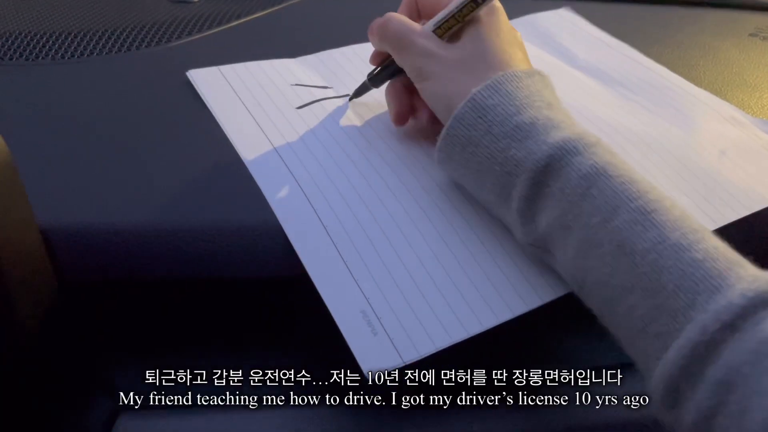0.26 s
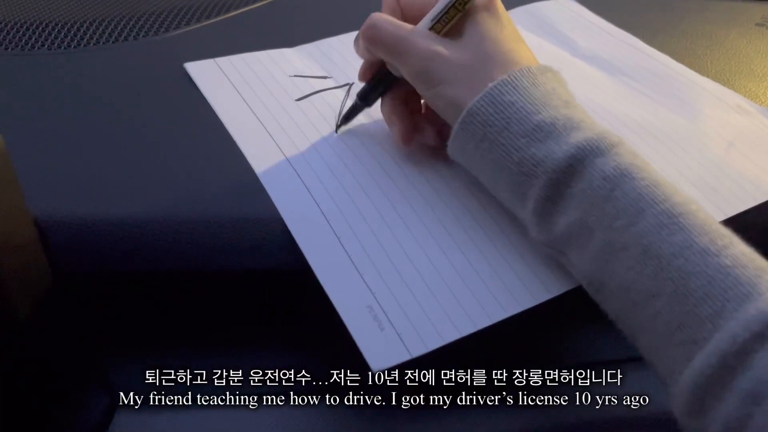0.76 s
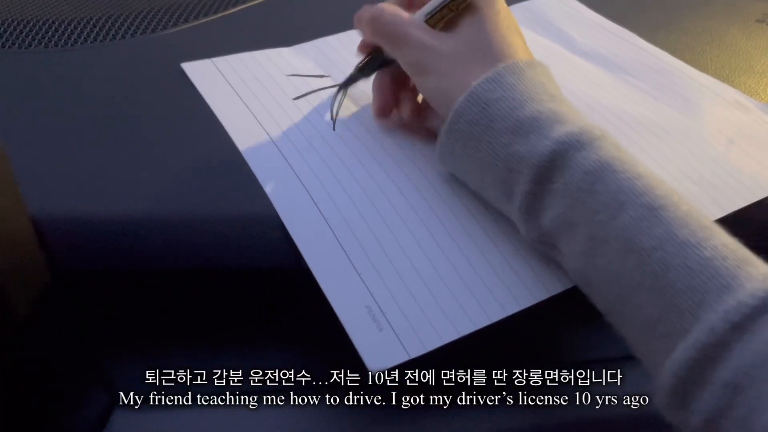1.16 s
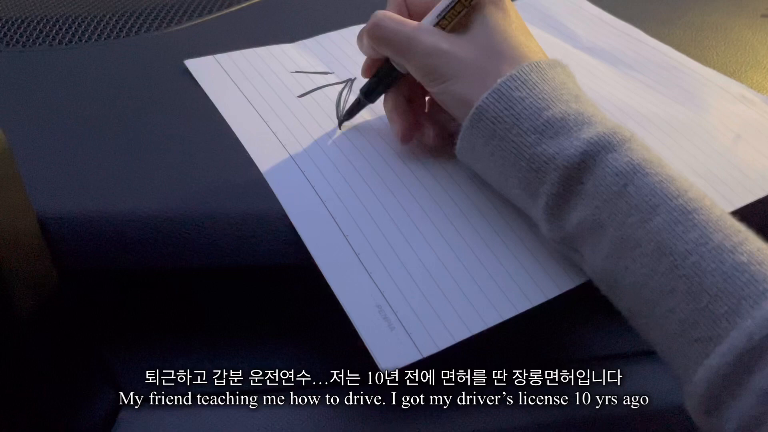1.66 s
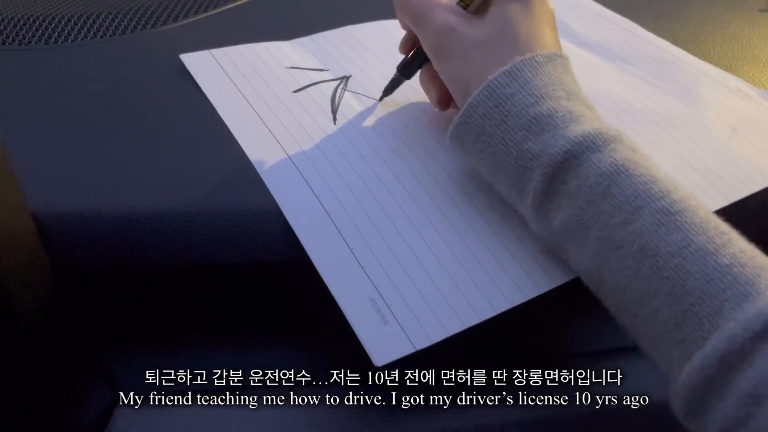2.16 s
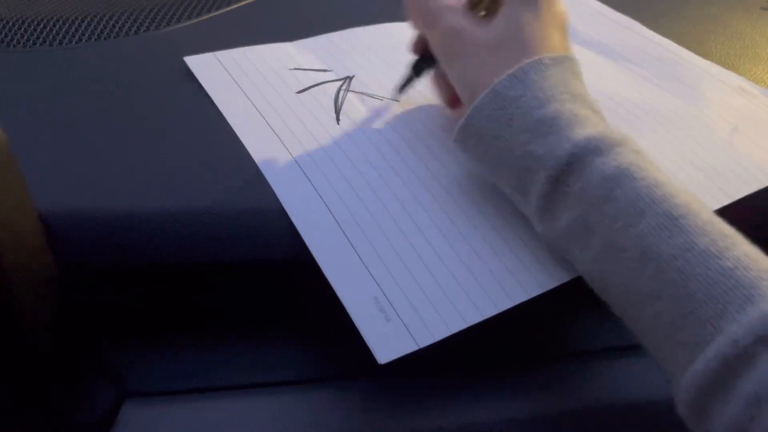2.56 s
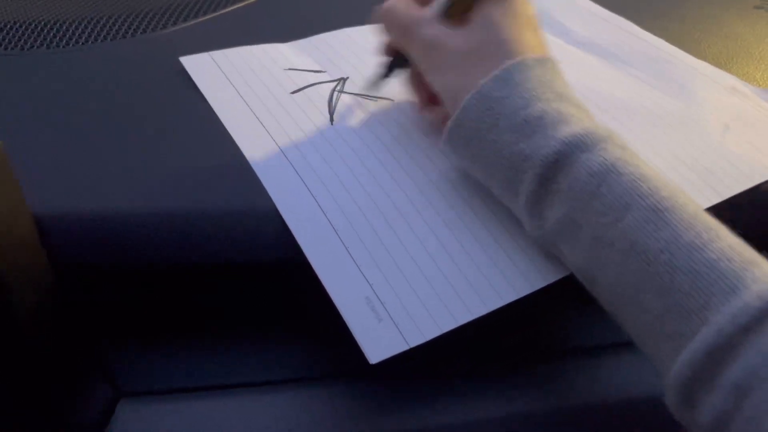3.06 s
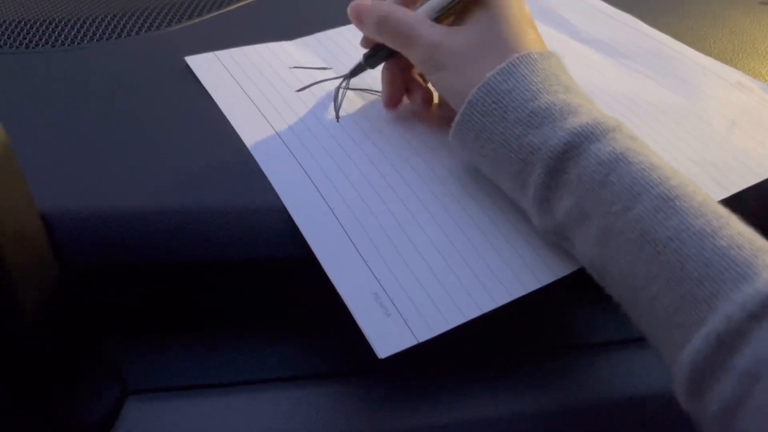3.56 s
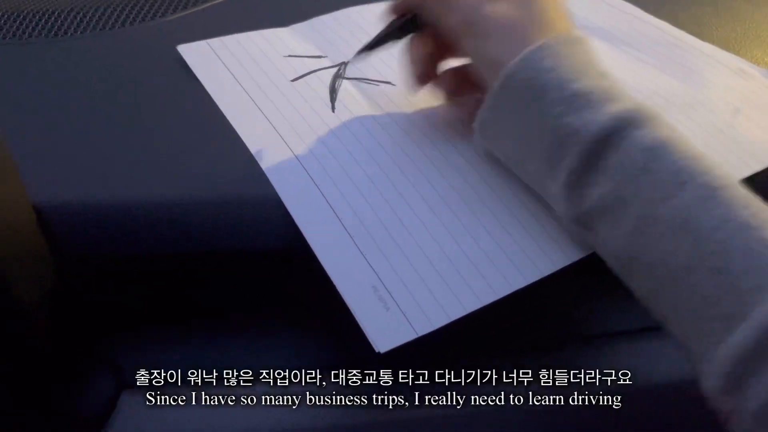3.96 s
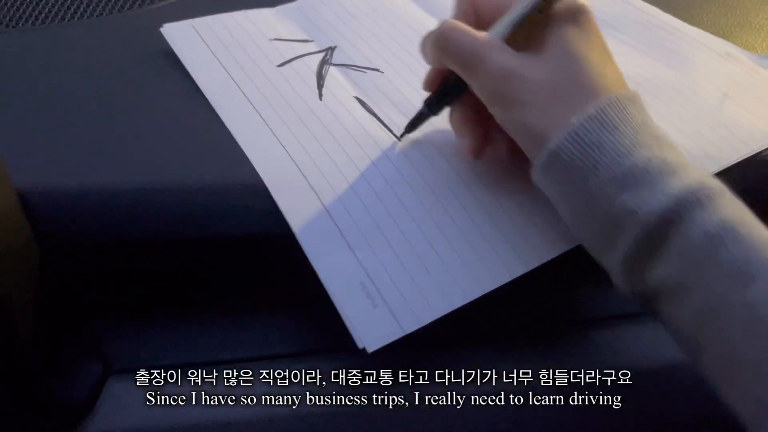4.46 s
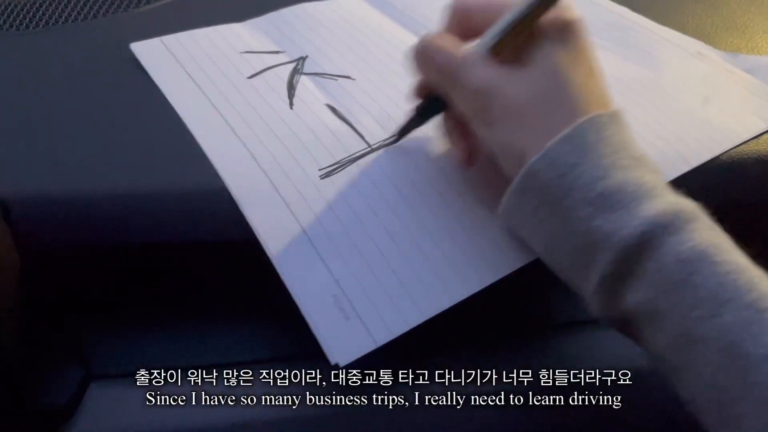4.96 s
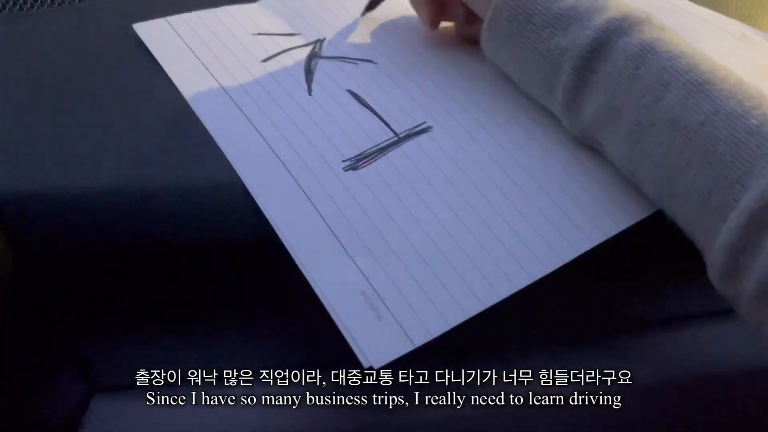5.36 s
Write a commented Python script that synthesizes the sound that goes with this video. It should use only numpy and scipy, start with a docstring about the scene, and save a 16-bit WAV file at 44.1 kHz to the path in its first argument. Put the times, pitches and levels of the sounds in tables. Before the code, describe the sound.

A felt-tip marker scratches short, dry strokes on paper over a hollow panel, with soft low thumps and tiny pauses, in a quiet car cabin.

```python
"""Felt-tip hatching on paper

A felt-tip marker hatches short strokes on a sheet over a hollow plastic panel in a quiet cabin.
Random fibre catches ring sheet and air gap and hiss off the felt; snags, ticks and bumps add noise bursts.
The drag shakes the panel's low modes, knocks strike them, and the resting hand rumbles in lurches."""
import sys
import numpy as np
from scipy import signal
from scipy.fft import rfft, irfft, next_fast_len
from scipy.io import wavfile

SR = 44100
rng = np.random.default_rng(int(sys.argv[2]) if len(sys.argv) > 2 else 0)


def decibels_to_gain(level_db):
    """Convert a level in decibels to a linear amplitude gain (20 dB per decade)."""
    exponent = np.asarray(level_db, float) / 20
    return 10 ** exponent


def output_pcm(signal):
    """Save a mono or channel-first signal as 16-bit PCM at the path in sys.argv[1].

    Samples are clipped to [-1, 1] before scaling.
    """
    pcm = np.clip(np.atleast_2d(signal).T, -1, 1) * 32767
    wavfile.write(sys.argv[1], SR, np.round(pcm).astype(np.int16))


N = 247167
SIDES = np.array([[1], [-1]])   # left, right


def rms_one(x):
    """Scales to rms 1."""
    return x / np.sqrt(np.mean(x ** 2) + 1e-20)


def drift(rate_hz):
    """Slow random wander of rms 1: noise twice through a one-pole low-pass."""
    r = np.exp(-2 * np.pi * rate_hz / SR)
    settle = 9000
    noise = rng.standard_normal(N + settle)
    return rms_one(signal.lfilter([1], [1, -2 * r, r * r], noise)[settle:])


def coloured(points):
    """Noise of rms 1 with a spectrum given as (Hz, dB per Hz), interpolated over log frequency."""
    hz, db = np.transpose(points)
    size = next_fast_len(N)
    grid = np.fft.rfftfreq(size, 1 / SR) + 1
    gain = decibels_to_gain(np.interp(np.log(grid), np.log(hz), db))
    return rms_one(irfft(rfft(rng.standard_normal(size)) * gain, size)[:N])


def in_time(rows):
    """Each column after the first, interpolated over the times in the first."""
    s, *columns = np.transpose(rows)
    return [np.interp(np.arange(N) / SR, s, c) for c in columns]


def resonate(x, hz, width_hz):
    """Two-pole resonance with gain 1 on top."""
    r = np.exp(-np.pi * width_hz / SR)
    b = np.array([1, 0, -1]) * (1 - r * r) / 2
    return signal.lfilter(b, [1, -2 * r * np.cos(2 * np.pi * hz / SR), r * r], x)


def body(x, modes, wander_db):
    """Parallel modes of alternating sign; their strengths wander as the contact point moves."""
    out = 0
    for k, (hz, width_hz, db) in enumerate(modes):
        gain = decibels_to_gain(db + wander_db * drift(10.9))
        out = out + (-1) ** k * gain * resonate(x, hz, width_hz)
    return out


def evened(x, share):
    """A driven body swells less by chance than free noise: part of its envelope is divided out."""
    envelope = np.abs(signal.hilbert(x, next_fast_len(N))[:N])
    return rms_one(x / (envelope + .15) ** share)


def dying_bursts(s, levels, t60_s):
    """One exponential decay per start time, for each row of levels."""
    starts = np.full((len(levels), N), 1e-18)
    starts[:, np.round(s * SR).astype(int)] = levels
    return signal.lfilter([1], [1, -decibels_to_gain(-60 / (t60_s * SR))], starts)


# Each row: start in seconds, length in seconds, time of the fastest moment as a share of the length
# (held to .02-.95), paper scrape height in dB, panel drag height in dB.
STROKE_ROWS = [(0.0, 0.63, 0.27, -69, -99), (0.176, 0.14, 0, -51, -56), (0.239, 0.19, 0.59, -47.5, -35.5),
               (0.46, 0.067, 0.18, -52, -45), (0.51, 0.12, 0.2, -67.5, -88),
               (0.579, 0.19, 0.59, -50, -28.5), (0.777, 0.22, 0.09, -54, -45),
               (0.919, 0.16, 0.45, -49.5, -29.5), (1.077, 0.13, 0.16, -50.5, -36),
               (1.193, 0.17, 0.51, -50, -30), (1.376, 0.1, 0.17, -51, -37),
               (1.459, 0.051, 0.15, -61.5, -60), (1.494, 0.17, 0.54, -49.5, -29),
               (1.691, 0.14, 0.49, -67.5, -58.5), (1.965, 0.07, 0.07, -73.5, -36.5),
               (2.01, 0.14, 0.37, -53, -38), (2.12, 0.11, 0, -77, -80), (2.194, 0.15, 0.23, -51.5, -45),
               (2.338, 0.16, 0.49, -55.5, -39.5), (2.461, 0.075, 0.13, -69.5, -80),
               (2.516, 0.16, 0.35, -50.5, -36.5), (2.674, 0.15, 0.49, -57, -39),
               (2.827, 0.15, 0.45, -52, -36.5), (2.975, 0.14, 0.58, -56.5, -37.5),
               (3.08, 0.077, 0.16, -72.5, -78), (3.139, 0.14, 0.35, -53.5, -39.5),
               (3.274, 0.11, 0.41, -59, -43.5), (3.34, 0.18, 0.52, -74, -87), (3.576, 0.028, 0, -78, -21.5),
               (3.62, 0.07, 0.43, -52, -34), (3.707, 0.04, 0.96, -64, -80), (3.731, 0.029, 0.28, -55, -29),
               (3.746, 0.12, 0.06, -57.5, -66), (3.792, 0.039, 0.25, -56.5, -33),
               (3.823, 0.067, 0.1, -58, -76), (3.851, 0.043, 0.37, -54.5, -34),
               (3.88, 0.049, 0.25, -58.5, -75), (3.915, 0.056, 0.23, -54.5, -33),
               (3.975, 0.068, 0.3, -66, -52.5), (4, 0.088, 0.95, -66, -40.5),
               (4.092, 0.059, 0.85, -50.5, -36.5), (4.141, 0.047, 0.51, -49.5, -54),
               (4.189, 0.045, 0.24, -52.5, -33), (4.202, 0.095, 0.31, -53, -72),
               (4.282, 0.054, 0.2, -51.5, -35), (4.323, 0.052, 0.2, -48.5, -41),
               (4.369, 0.054, 0.17, -50.5, -32.5), (4.403, 0.066, 0.23, -49.5, -41.5),
               (4.454, 0.041, 0.07, -51, -32.5), (4.462, 0.12, 0.28, -65.5, -88),
               (4.566, 0.032, 0.7, -66, -80), (4.577, 0.076, 0.3, -51.5, -45.5),
               (4.643, 0.072, 0.3, -46, -40), (4.695, 0.066, 0.77, -49.5, -34.5),
               (4.751, 0.069, 0.5, -47, -53), (4.818, 0.06, 0.36, -53, -54),
               (4.866, 0.062, 0.42, -48.5, -48), (4.916, 0.069, 0.36, -54, -45.5),
               (4.974, 0.054, 0.34, -47.5, -47), (5.019, 0.06, 0.37, -54, -46),
               (5.064, 0.062, 0.42, -48, -45.5), (5.104, 0.067, 0.6, -52.5, -46),
               (5.307, 0.12, 0.08, -72.5, -98), (5.359, 0.034, 0.25, -62.5, -91),
               (5.4, 0.039, 0.67, -72, -80), (5.423, 0.051, 0.35, -55, -38),
               (5.462, 0.048, 0.34, -51.5, -44), (5.497, 0.095, 0.58, -51.5, -51),
               (5.582, 0.083, 0.42, -51.5, -21)]
# Exponents of tip speed, in order: scrape, hiss, panel, thin top.
LAYER_SPEED_POWERS = (1.6, 2.43, 7.9, 3.7)
GRIP_S, LIFT_S = 0.00068, 0.013   # the felt bites fast and lets go slowly
GRIP_SHARE = 0.28   # share of the time to the fastest moment added to the grip
LIFT_SHARE = 0.06   # share of the length added to the lift
FIRM_STROKE_DB = -50
HISS_PER_SCRAPE, THIN_PER_SCRAPE = 1.26, 1.7   # dB per dB of scrape: light strokes are duller
AFTER_DB, AFTER_T60_S = (-13.5, -12.5, -16), 0.079   # rustle after the tip stops: scrape, hiss, thin top


def stroke_levels():
    """The tip speeds up from rest and slows to rest in each stroke; four layers follow that speed."""
    power, far, t = np.zeros((4, N)), np.zeros(N), np.arange(N) / SR
    exponents = np.array(LAYER_SPEED_POWERS)[:, None]
    for start_s, length_s, fastest, scrape_db, panel_db in STROKE_ROWS:
        now = (t > start_s) & (t < start_s + length_s)
        since_s, top = t[now] - start_s, np.clip(fastest, .02, .95)
        u = since_s / length_s
        speed = (u / top) ** top * ((1 - u) / (1 - top)) ** (1 - top)   # 1 at the fastest moment
        grip = np.minimum(since_s / (GRIP_S + GRIP_SHARE * top * length_s), 1)
        lift = np.minimum((length_s - since_s) / (LIFT_S + LIFT_SHARE * length_s), 1)
        contact = (grip * lift) ** 2
        hiss_db = FIRM_STROKE_DB + HISS_PER_SCRAPE * (scrape_db - FIRM_STROKE_DB)
        thin_db = FIRM_STROKE_DB + THIN_PER_SCRAPE * (scrape_db - FIRM_STROKE_DB)
        heights = decibels_to_gain(np.array([scrape_db, hiss_db, panel_db, thin_db]))[:, None]
        power[:, now] += (heights * contact * speed ** exponents) ** 2
        far[now] = u if fastest > .3 else 1 - u   # the direction of travel along the sheet
    fade = decibels_to_gain(-120 / (AFTER_T60_S * SR))   # per sample, of power
    paper = [0, 1, 3]
    rustle = signal.lfilter([1 - fade], [1, -fade], power[paper])
    power[paper] += decibels_to_gain(np.array(AFTER_DB))[:, None] ** 2 * rustle
    return *np.sqrt(power), far


def fibre_catches(per_s, spread_db):
    """Dense random slips of felt over paper fibres, a few much larger than the rest."""
    sizes = decibels_to_gain(spread_db * np.minimum(rng.exponential(1, N), 5)) * rng.choice([-1, 1], N)
    return sizes * (rng.random(N) < per_s / SR)


# Reflections off fingers and sleeve. Each row: mean delay in ms, level in dB.
ECHO_ROWS = [(1.301, -4), (2.895, -2.5), (5.301, -5.5)]


def echoed(x):
    """Close echoes whose paths change as the hand moves draw shifting stripes in the hiss."""
    at = np.arange(N)
    out = x
    for ms, db in ECHO_ROWS:
        delay = SR * ms / 1000 * (1 + .1 * drift(1.5))
        out = out + decibels_to_gain(db) * np.interp(np.round(at - delay), at, x)
    return out


# Paper resonances. Each row: frequency in Hz, width in Hz, level in dB.
SHEET_MODES = [(907, 88, -6), (1738, 21, 2.5), (2058, 480, -1), (2780, 1030, -0.5), (3500, 890, 2),
               (4320, 670, 3.5), (4750, 520, 2.5), (6015, 560, 1.5)]
# Sheet resonances that vary from place to place. Each row: frequency in Hz, width in Hz, level in dB.
LOCAL_RING_MODES = [(1332, 550, -12.5), (2850, 580, -11.5), (4685, 380, -12.5)]
# Offsets of those resonances. Each row: time in seconds, near 1.35 kHz in dB, near 2.9 kHz in dB,
# near 5 kHz in dB.
LOCAL_RING_LEVELS = [(0, -1.5, -5, 3), (.6, 2.5, 3.5, -1.5), (1.1, -1.5, 3.5, 1), (1.7, 0, 4.5, -3.5),
                     (2.05, 4, 3.5, -1.5), (2.5, 1, -1, 2), (3.0, 1, -1.5, 4), (3.4, 1, 2.5, -1),
                     (3.65, -3.5, 8.5, -3), (3.85, -2.5, 5.5, -7), (4.15, 6, 4, 4), (4.33, 0, 6.5, 2),
                     (4.5, 3, -2, 0), (4.8, 4.5, -1.5, -3), (5.15, 5.5, -4, -7), (5.37, 4, 8, -1),
                     (5.6, -4, -10, 11)]
# Air gap under the sheet. Each row: frequency in Hz, width in Hz, level in dB.
AIR_GAP_MODES = [(529, 78, 3.5), (973, 35, 5), (1227, 130, -5), (2133, 300, 4)]
# Felt resonances. Each row: frequency in Hz, width in Hz, level in dB.
FELT_HISS_MODES = [(6950, 600, 1), (7800, 500, -4), (8600, 500, 0), (9700, 600, -3), (10700, 1000, -1),
                   (11600, 500, -6), (12600, 1300, -4)]
# Offset of the highest felt resonance. Each row: time in seconds, level in dB.
FELT_TOP_LEVEL = [(0, 0), (1.0, 4), (1.2, 4), (1.7, -2), (2.1, -9), (2.5, -6), (2.9, -34), (3.4, -26.5),
                  (3.6, 2.5), (4.3, 1), (4.7, -12), (5.2, -16), (5.5, 3)]
# Near end, middle and far end of a stroke. Each row: frequency in Hz, width in Hz, level in dB.
WHISTLE_MODES = [(15500, 1000, 1), (14900, 1000, 2), (14300, 1000, 0)]
# Colour along the sheet. Each row: time in seconds, air-gap ring over the scrape in dB, hiss over the
# scrape of a firm stroke in dB, thin top over that scrape in dB.
PLACE_LEVELS = [(0, -18.5, 6.5, 6), (.9, -11, 10, 17), (1.7, -16, 9.5, 13), (2.0, -5, 1, -1),
                (2.5, -26, 9, 9.5), (3.4, -23, 9.5, 12), (3.6, -23, 15.5, 16), (4.0, -12, 10, 17),
                (4.15, -6, 6, 10), (4.6, -6, 1, 5), (5.2, -11.5, 1.5, 8), (5.4, -6, 2.5, 6),
                (5.6, -32, 5, 9)]


def marker(scrape, hiss, thin, far):
    """Juddering slips ring sheet and gap and hiss off the felt; separate slips ring local sheet modes."""
    gap_db, felt_db, thin_db = in_time(PLACE_LEVELS)
    slips = echoed(fibre_catches(16000, spread_db=2.2) * decibels_to_gain(1.5 * drift(90)))
    sheet = rms_one(body(slips, SHEET_MODES, wander_db=1.5))
    separate_slips = echoed(fibre_catches(16000, spread_db=2.2))   # so that these rings add in power
    for (hz, width_hz, db), place_db in zip(LOCAL_RING_MODES, in_time(LOCAL_RING_LEVELS)):
        sheet = sheet + decibels_to_gain(db + place_db) * rms_one(resonate(separate_slips, hz, width_hz))
    gap = decibels_to_gain(gap_db) * rms_one(body(slips, AIR_GAP_MODES, wander_db=4.0))
    lower = body(slips, FELT_HISS_MODES[:-1], wander_db=2.5)
    highest = decibels_to_gain(in_time(FELT_TOP_LEVEL)[0]) * body(slips, FELT_HISS_MODES[-1:], wander_db=2.5)
    steep = signal.butter(4, 6000, "high", fs=SR, output="sos")
    felt = decibels_to_gain(felt_db) * rms_one(signal.sosfilt(steep, lower + highest))
    near_end, middle, far_end = [decibels_to_gain(db) * resonate(resonate(slips, hz, width_hz), hz, width_hz)
                                 for hz, width_hz, db in WHISTLE_MODES]
    whistle = (1 - 2 * far).clip(0) * near_end   # pitch falls towards the far end
    whistle = whistle + (1 - np.abs(1 - 2 * far)) * middle + (2 * far - 1).clip(0) * far_end
    return scrape * (sheet + gap) + hiss * felt + thin * decibels_to_gain(thin_db) * rms_one(whistle)


# The tip snags and the sheet buckles. Each row: start in seconds, rms before the onset is smoothed
# in dB, crispness 0-1.
SNAG_ROWS = [(0.02, -78.5, 0.6), (0.055, -72, 0.15), (0.182, -44.5, 0.93), (0.464, -69, 0.5),
             (0.619, -44.5, 0.8), (0.776, -53, 1), (0.933, -41, 0.93), (1.082, -48, 0.7),
             (1.216, -49.5, 0.98), (1.384, -41, 0.33), (1.969, -48.5, 0.05), (2.202, -42, 0.03),
             (2.445, -36.5, 0.13), (2.535, -34, 0.15), (2.847, -37.5, 0.08), (3.151, -39.5, 0),
             (3.627, -50.5, 1), (3.983, -53, 0.7), (4.144, -44, 0.45), (4.321, -43.5, 0.75),
             (4.657, -44, 0.34), (5.316, -48.5, 0.15), (5.475, -52, 0), (5.546, -45.5, 0.1)]
# Each row: frequency in Hz, level in dB per Hz.
SNAG_DULL_COLOUR = [(250, 16), (550, 6.5), (700, 2.5), (1100, -4), (2300, -10), (4000, -62)]
# Each row: frequency in Hz, level in dB per Hz.
SNAG_CRISP_COLOUR = [(700, -31), (1400, -9), (2000, -12), (2900, 12), (4000, -0.5), (6000, -4.5),
                     (9000, -44)]
SNAG_T60_S = 0.092
SNAG_GAP_DB = 4   # gap ring above its ring under the scrape


def snags():
    """Each snag is a short papery puff that dies fast: dull thud, crisp rasp and a ring of the air gap."""
    s, db, crisp = np.transpose(SNAG_ROWS)
    crisp = np.clip(crisp, 0, 1)
    dying = dying_bursts(s, decibels_to_gain(db) * np.array([1 - crisp, crisp]), SNAG_T60_S)
    dull, rasp = signal.lfilter([.02], [1, -.98], dying)   # softens the onset
    gap_db = in_time(PLACE_LEVELS)[0] + SNAG_GAP_DB
    gap = decibels_to_gain(gap_db) * rms_one(body(rng.standard_normal(N), AIR_GAP_MODES, wander_db=4.0))
    return dull * coloured(SNAG_DULL_COLOUR) + rasp * (coloured(SNAG_CRISP_COLOUR) + gap)


# The tip touches or leaves the sheet. Each row: start in seconds, starting level in dB, dullness 0-1.
TICK_ROWS = [(0.175, -49, 0.5), (1.672, -54.5, 0.04), (1.93, -72, 0.95), (1.965, -63, .2),
             (1.972, -62, 0.5), (2.015, -60, .1), (3.57, -57, 0.16), (3.572, -59, 0.4), (3.676, -54, 0.5),
             (4.764, -52, .3), (5.313, -56, 0.7), (5.366, -62, 0.4), (5.473, -44, 0.15)]
# Each row: frequency in Hz, level in dB per Hz.
TICK_DULL_COLOUR = [(500, 1), (2200, 12), (3500, -6), (6000, -18), (12000, -33)]
# Each row: frequency in Hz, level in dB per Hz.
TICK_BRIGHT_COLOUR = [(1000, -18), (3300, 1), (7000, 0), (11000, -4), (16000, -4)]
TICK_T60_S = 0.02


def ticks():
    """Each contact is a very short burst of noise, a mix of dull and bright."""
    s, db, dull = np.transpose(TICK_ROWS)
    dull = np.clip(dull, 0, 1)
    low, high = dying_bursts(s, decibels_to_gain(db) * np.array([dull, 1 - dull]), TICK_T60_S)
    return low * coloured(TICK_DULL_COLOUR) + high * coloured(TICK_BRIGHT_COLOUR)


# The side of the hand bumps the sheet. Each row: start in seconds, rms before the onset is smoothed in dB.
BUMP_ROWS = [(0.02, -49), (0.045, -47), (0.06, -48), (2.442, -40), (5.165, -47), (5.18, -46), (5.314, -63),
             (5.547, -53)]
# Each row: frequency in Hz, level in dB per Hz.
BUMP_NOISE_COLOUR = [(100, -12), (250, 2.5), (450, 4), (620, -12.5), (800, -28), (1200, -75)]
BUMP_T60_S = 0.065


def bumps():
    """A soft low thump: dull noise that swells quickly and dies."""
    s, db = np.transpose(BUMP_ROWS)
    dying = dying_bursts(s, decibels_to_gain(db)[None], BUMP_T60_S)[0]
    swell = signal.lfilter([.01], [1, -.99], dying)
    return swell * evened(coloured(BUMP_NOISE_COLOUR), share=.5)


# Two phase patterns between left and right treble, A and B. Each row: frequency in Hz, lead of the
# right side in turns in pattern A, the same in pattern B.
PHASE_PATTERNS = [(0, 0, 0), (5000, .015, .015), (5900, .1, .16), (6500, .33, .45), (6850, .47, .5),
                  (7100, .5, .5), (7900, .5, .5), (8300, .62, .5), (8700, .72, .6), (9900, .95, .9),
                  (10300, 1, 1), (11600, 1, 1), (12100, 1.04, 1.08), (13000, 1.22, 1.3), (13500, 1.33, 1.5),
                  (14200, 1.5, 1.5), (14900, 1.5, 1.5), (15300, 1.68, 1.5), (16000, 1.76, 1.52),
                  (17000, 1.8, 1.55)]
# Crossfade from A to B. Each row: time in seconds, share of B 0-1.
PATTERN_MIX_ROWS = [(0, 0.7), (.24, 1), (.3, 0), (1.0, 0.3), (1.7, 0.04), (2.0, 1), (2.2, 0.1), (2.3, 0.55),
                    (2.55, 0.7), (3.4, 0.5), (3.7, .5), (4.1, 0.2), (4.5, 0), (4.8, 0), (5.6, 0)]
PATTERN_MIX_WOBBLE = .25   # rms, before the mix is held to 0-1


def treble_phase(x):
    """Left and right treble differ in phase by frequency, in a wandering crossfade of two patterns."""
    hz, *leads = np.transpose(PHASE_PATTERNS)
    size = next_fast_len(N)
    grid = np.fft.rfftfreq(size, 1 / SR)
    halves = [np.exp(1j * np.pi * np.interp(grid, hz, turns)) for turns in leads]
    pattern_a, pattern_b = [irfft(rfft(x, size) * np.array([1 / half, half]), size)[:, :N]
                            for half in halves]
    mix = np.clip(in_time(PATTERN_MIX_ROWS)[0] + PATTERN_MIX_WOBBLE * drift(5.0), 0, 1)
    return (1 - mix) * pattern_a + mix * pattern_b


# Bands where left and right pass from in step to opposed. Each row: frequency in Hz, level in dB per Hz.
SCATTER_HISS_COLOUR = [(5000, -40), (6200, -3), (6850, -45), (8050, -45), (9200, 0), (10300, -45),
                       (11600, -45), (13000, -6), (13900, -45), (15000, -45), (16000, -25)]
SCATTER_HISS_DB = -8.0
STRAY_DB, STRAY_SWING_DB = -35, 5   # faint broad treble, mean and rms swing


def scattered(scrape, hiss):
    """Scrape noise opposed between the sides, and felt hiss drawn separately for each."""
    scrape_colour = [(500, -6.5), (1000, -1.0), (2000, -10.5), (4000, -3.5), (5500, -4.5), (6800, -53.5)]
    opposed = decibels_to_gain(-9.0) * scrape * coloured(scrape_colour) * SIDES
    felt_db = in_time(PLACE_LEVELS)[1]
    unlike = np.array([coloured(SCATTER_HISS_COLOUR) for side in SIDES])
    stray_colour = [(5500, -40), (6500, 0), (16000, 0)]
    stray = np.array([coloured(stray_colour) for side in SIDES])
    stray_level = decibels_to_gain(STRAY_DB + STRAY_SWING_DB * drift(7.0) + felt_db) * hiss
    return opposed + decibels_to_gain(SCATTER_HISS_DB + felt_db) * hiss * unlike + stray_level * stray


# Each row: frequency in Hz, width in Hz under drag, level in dB.
HOLLOW_PANEL_MODES = [(215.2, 14.1, 5), (303, 41, -9.5), (187.7, 5.6, -1), (355, 32, -22.5)]
# Tip or hand knocking the panel. Each row: start in seconds, peak in dB before the side balance.
KNOCK_ROWS = [(0.017, -34), (0.057, -36.5), (0.611, -30.5), (1.708, -50), (1.825, -44), (1.878, -36),
              (1.974, -29.5), (2.17, -35.5), (2.208, -29.5), (3.579, -33.5), (5.135, -35.5), (5.164, -40),
              (5.184, -37), (5.418, -34), (5.522, -33.5)]
KNOCK_TOP_HZ = 340
PANEL_LAG_S = 0.0094   # the panel takes a moment to build up


def panel(drag):
    """Uneven drag and soft knocks shake the hollow panel under the sheet."""
    lag = np.exp(-1 / (PANEL_LAG_S * SR))
    drag = signal.lfilter([1 - lag], [1, -lag], drag)
    modes = rms_one(body(rng.standard_normal(N), HOLLOW_PANEL_MODES, wander_db=2.5))
    heavy = signal.butter(3, 380, fs=SR, output="sos")   # the heavy panel passes no treble
    out = signal.sosfilt(heavy, drag * evened(modes, share=.6))
    soft_contact = signal.butter(4, KNOCK_TOP_HZ, fs=SR, output="sos")
    for s, peak_db in KNOCK_ROWS:
        blow = np.zeros(round(.15 * SR))
        blow[0] = 1
        soft = signal.sosfilt(soft_contact, blow)
        ring = sum(decibels_to_gain(db) * resonate(soft, hz, 2.5 * width_hz) for hz, width_hz, db in HOLLOW_PANEL_MODES)
        knock = decibels_to_gain(peak_db) * ring / np.abs(ring).max()
        out = out + np.pad(knock, (round(s * SR), N))[:N]
    side_colour = [(120, -43.5), (220, -3.0), (330, -18.0), (500, -24.0), (1000, -67)]
    return out * decibels_to_gain(-.5 * SIDES) + decibels_to_gain(-19.0) * drag * coloured(side_colour) * SIDES


# Rumble between lurches. Each row: time in seconds, level in dB.
REST_LEVEL = [(0, -54.5), (.4, -62.5), (.62, -68), (.9, -57.5), (1.3, -49.5), (2.0, -57.5), (2.7, -51),
              (2.95, -41.5), (3.1, -52), (3.8, -53), (4.15, -52), (4.65, -51.5), (4.85, -74), (5.15, -50.5),
              (5.32, -70), (5.6, -63)]
# The hand lurches on the panel. Each row: time of greatest weight in seconds, half-length in seconds,
# level in dB.
LURCH_ROWS = [(0.062, 0.21, -40), (0.219, 0.091, -44.5), (1.37, 0.083, -45), (1.506, 0.034, -38.5),
              (1.559, 0.05, -38.5), (1.704, 0.14, -36), (1.818, 0.14, -37.5), (1.916, 0.12, -42.5),
              (2.157, 0.1, -33.5), (2.272, 0.4, -39.5), (2.392, 0.19, -47), (2.65, 0.019, -30.5),
              (3.065, 0.053, -41), (3.24, 0.17, -44.5), (3.448, 0.27, -39.5), (3.676, 0.31, -44),
              (4.284, 0.44, -37.5), (4.375, 0.038, -32), (4.745, 0.25, -30), (5.029, 0.09, -50),
              (5.187, 0.054, -35.5), (5.236, 0.19, -46.5), (5.589, 0.29, -41)]
# Each row: frequency in Hz, level in dB per Hz.
HAND_RUMBLE_COLOUR = [(15, -27), (30, -14.5), (80, -0.5), (120, -5.5), (200, -10), (300, -31.5),
                      (550, -36.5), (900, -67)]
LURCH_POWER = 20.5   # how pointed the swell of a lurch is


def hand():
    """Lumpy low rumble of the resting hand; each lurch swells and fades evenly."""
    t = np.arange(N) / SR
    power = decibels_to_gain(in_time(REST_LEVEL)[0] + 3.87 * drift(3.06)) ** 2
    for s, half_s, db in LURCH_ROWS:
        swell = np.cos(np.pi / 2 * np.clip((t - s) / half_s, -1, 1)).clip(0) ** LURCH_POWER
        power = power + (decibels_to_gain(db) * swell) ** 2
    shared = evened(coloured(HAND_RUMBLE_COLOUR), share=0.023)
    opposed = decibels_to_gain(-10.5) * coloured(HAND_RUMBLE_COLOUR) * SIDES
    return np.sqrt(power) * (shared + opposed)


# Each row: frequency in Hz, level in dB per Hz.
CABIN_AIR_COLOUR = [(100, -12.5), (200, -2.5), (300, -4), (455, -11), (725, -22), (950, -26), (1150, -35),
                    (1900, -42), (4000, -46), (7500, -51), (16000, -67.5)]


def cabin_air():
    """Steady low noise, its shared and its opposed part equally strong."""
    part_db = -62
    return decibels_to_gain(part_db) * (coloured(CABIN_AIR_COLOUR) + coloured(CABIN_AIR_COLOUR) * SIDES)


def scene():
    """Marker, panel and hand; the low sounds differ a little between the sides, the cabin air much more."""
    scrape, hiss, drag, thin, far = stroke_levels()
    tip = treble_phase(marker(scrape, hiss, thin, far) + snags() + ticks() + bumps())
    return tip + scattered(scrape, hiss) + panel(drag) + hand() + cabin_air()


def top_cut(x):
    """Nothing passes above the cut-off."""
    return signal.sosfilt(signal.butter(12, 16470, fs=SR, output="sos"), x)


def record(dry):
    """The top is cut steeply, 50 dB down from 15.9 kHz."""
    steep = signal.cheby2(24, 50, 15900, fs=SR, output="sos")
    mix = signal.sosfilt(steep, dry)
    return top_cut(mix)


dry = scene()
out = record(dry)
output_pcm(out)
```